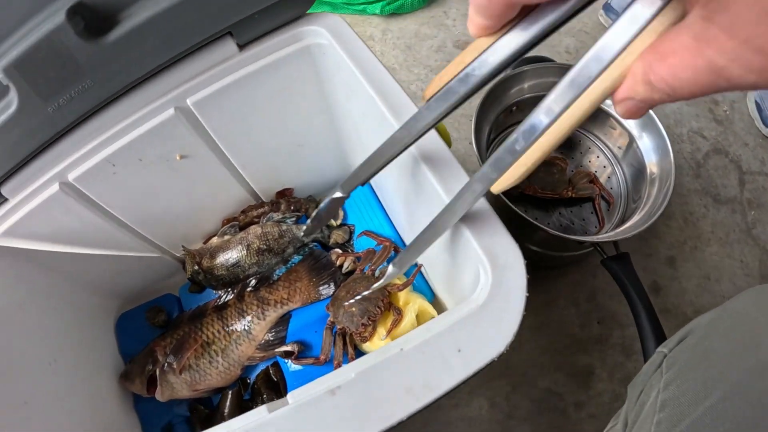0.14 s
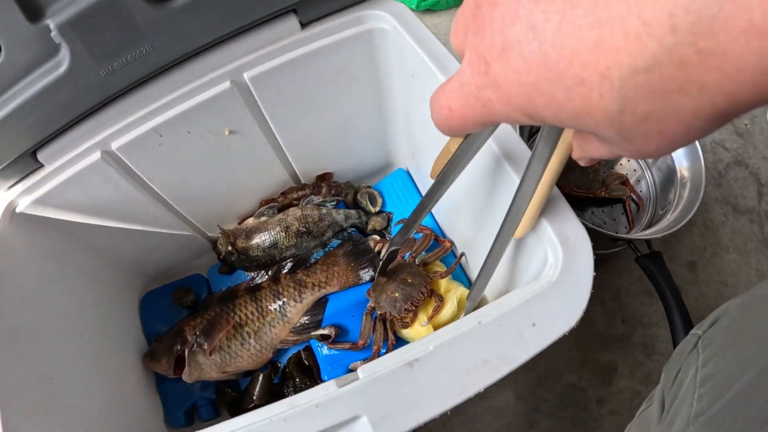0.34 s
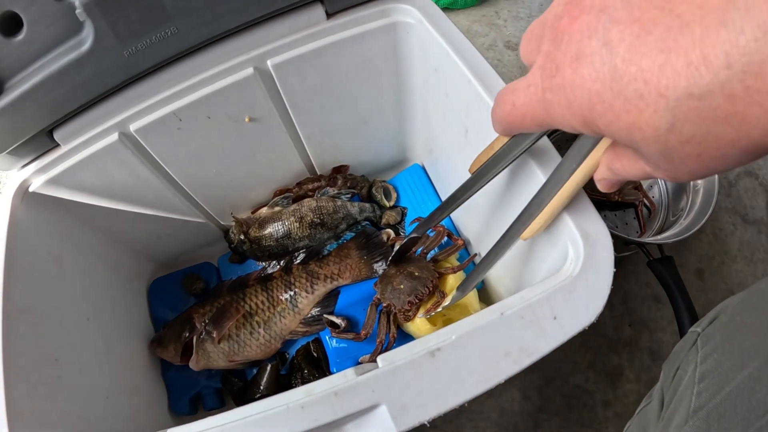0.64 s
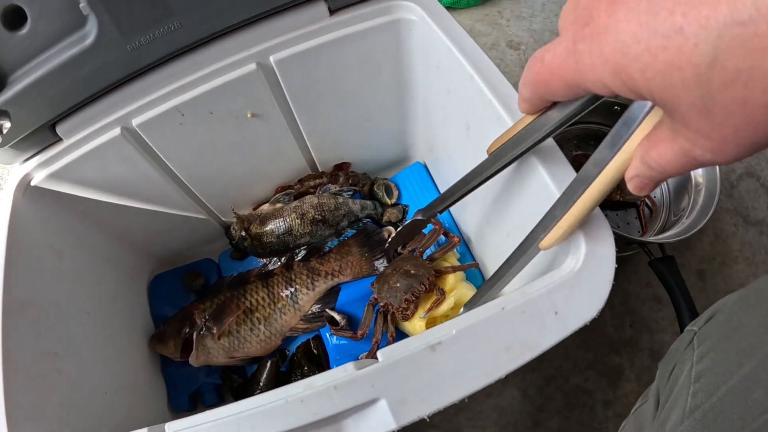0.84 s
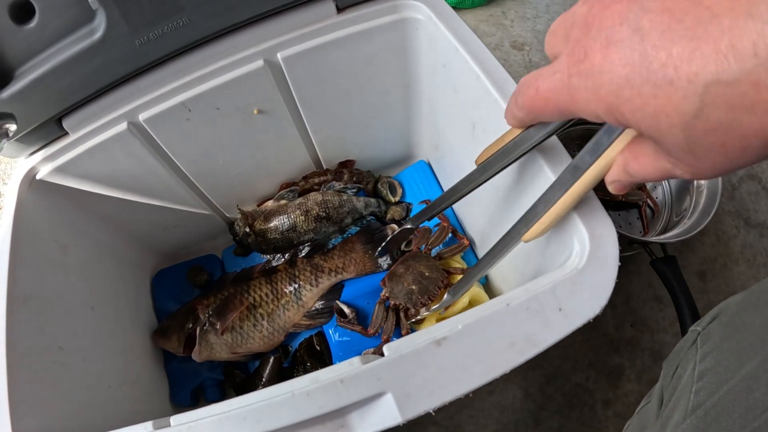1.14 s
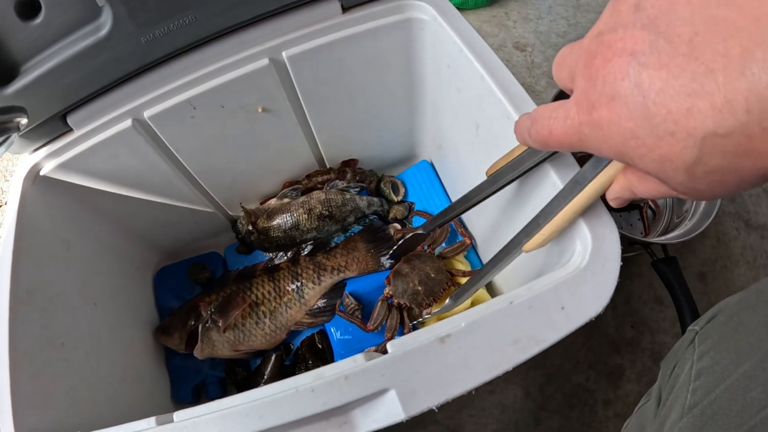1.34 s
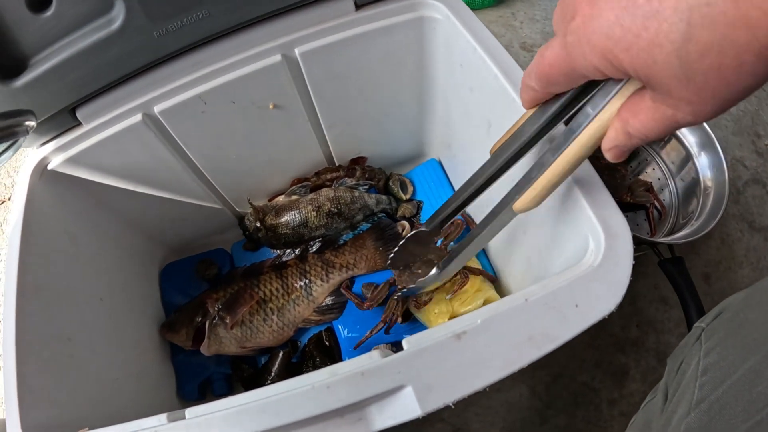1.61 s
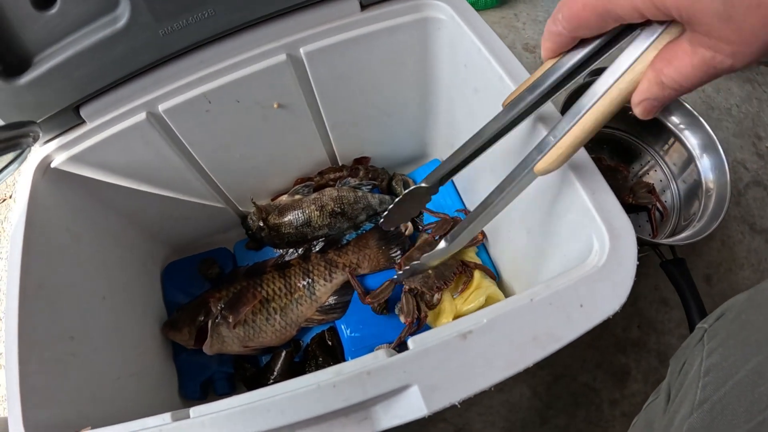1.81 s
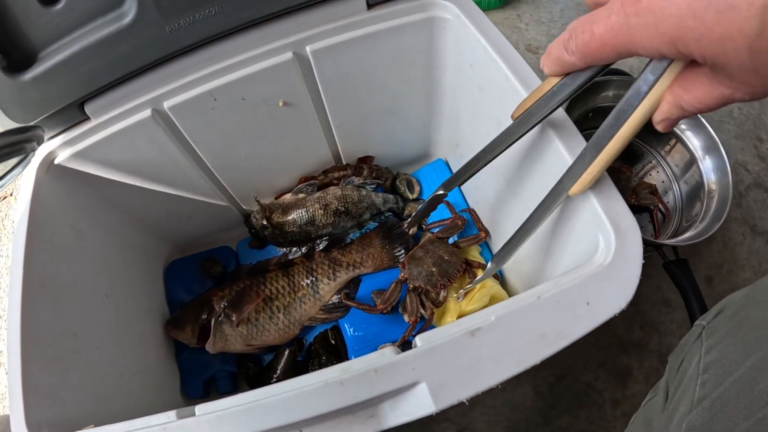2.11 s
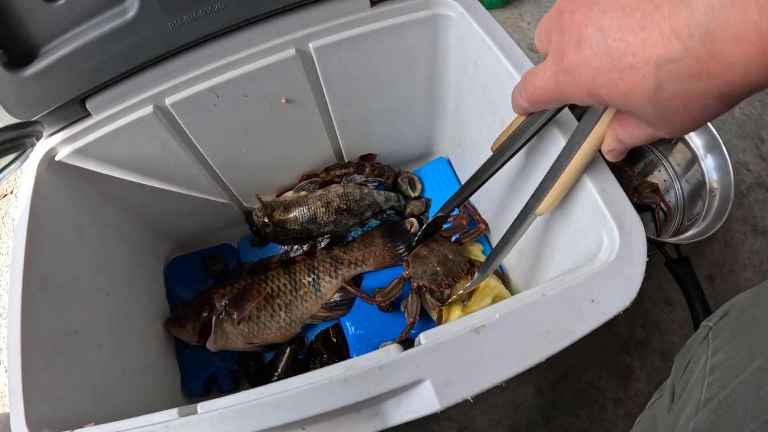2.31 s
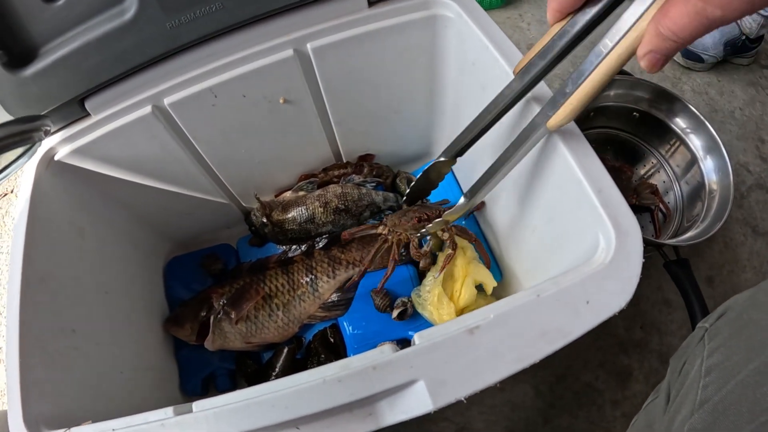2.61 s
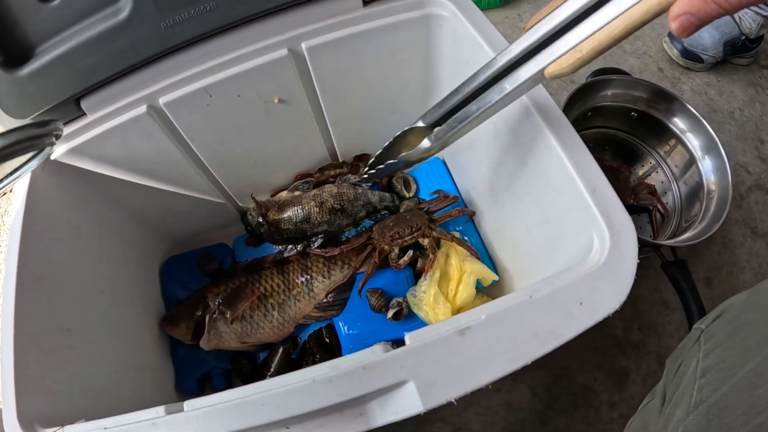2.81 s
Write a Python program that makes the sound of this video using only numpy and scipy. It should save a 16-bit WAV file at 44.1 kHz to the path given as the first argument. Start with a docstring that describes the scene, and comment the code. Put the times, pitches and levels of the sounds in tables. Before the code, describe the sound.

Metal tongs knock, click and scrape on crab shell inside a hollow plastic cooler, close up

```python
"""In a hollow plastic cooler, heard close by, steel tongs feel for a crab. Dull knocks boom: each rings
the wall modes (damped sines) and rattles the contents (dying noise). The tips click on shell and plastic
(short noise bursts), scrape over shell (clumps of tiny slips) and set the steel arms ringing. Behind them
a rustle and murmur rises and dips (wavering noise), with a faint hiss and a low rumble underneath."""
import sys
import numpy as np
from scipy import signal
from scipy.fft import rfft, irfft, next_fast_len
from scipy.io import wavfile
from scipy.ndimage import uniform_filter1d, map_coordinates

SR = 44100
rng = np.random.default_rng(int(sys.argv[2]) if len(sys.argv) > 2 else 0)


def voltage_ratio(decibels):
    """Convert decibels (scalar or array-like) to amplitude ratios, 20 dB per decade."""
    exponent = np.asarray(decibels, float) / 20
    return 10 ** exponent


def store_pcm(level_fs):
    """Save levels as 16-bit WAV."""
    pcm = np.round(np.clip(level_fs, -1, 1) * 32767).astype(np.int16)
    wavfile.write(sys.argv[1], SR, np.atleast_2d(pcm).T)


N = 130095  # length in samples

# Low rumble over time. Each row: time in seconds, level in dB.
RUMBLE_LEVELS = [(0.0, -60.5), (0.09, -53), (0.52, -48), (0.58, -65), (0.87, -58), (0.91, -42), (0.97, -58),
                 (1.31, -50), (1.33, -58), (1.76, -37), (1.86, -77), (2.0, -43), (2.04, -69), (2.55, -49.5),
                 (2.63, -82), (2.78, -58), (2.84, -40), (2.95, -72)]
# Tone colour of the rumble. Each row: frequency in Hz, relative level in dB.
RUMBLE_COLOUR = [(12, -36), (24, -4), (46, 0), (70, -6), (100, -11.5), (120, -12), (140, -33), (240, -120)]
# A faint narrow hiss over time. Each row: time in seconds, level in dB.
FAINT_LEVELS = [(2.055, -68.5), (2.09, -57.5), (2.135, -55.5)]
# Tone colour of that faint hiss. Each row: frequency in Hz, relative level in dB.
FAINT_COLOUR = [(2200, -37), (2700, -4), (3700, -4), (4300, -53)]
# Background rustle and murmur, which dip at times. Each row: time in seconds,
# then treble, mid and wall murmur levels in dB.
RUSTLE_LEVELS = [(0.0, -57, -45.5, -50), (0.15, -51.5, -42.5, -47), (0.25, -60.5, -46.5, -34.5),
                 (0.39, -52, -48.5, -32), (0.52, -49, -53, -39.5), (0.65, -49.5, -50.5, -45.5),
                 (0.81, -49.5, -57.5, -50), (0.93, -47, -49, -53), (1.055, -61.5, -59, -52.5),
                 (1.1, -49.5, -49, -47), (1.22, -44, -45, -47), (1.31, -54.5, -53, -43.5),
                 (1.49, -52, -51, -41), (1.61, -53, -54.5, -45), (1.66, -38, -47.5, -48),
                 (1.82, -50.5, -48.5, -41), (1.93, -62, -70.5, -60), (2.0, -63, -51, -30),
                 (2.08, -61, -53, -38.5), (2.16, -65, -63, -43), (2.23, -60, -57, -32),
                 (2.29, -50.5, -40, -39.5), (2.36, -49, -47.5, -26), (2.46, -45, -49.5, -36.5),
                 (2.52, -38, -48.5, -42.5), (2.65, -58.5, -62, -52.5), (2.73, -45, -51, -41.5),
                 (2.79, -45, -57, -51.5), (2.89, -47.5, -47, -41), (2.95, -60, -51, -52)]
# Colours of the rustle's treble, mid and wall murmur. Each row: frequency in Hz, relative level in dB.
RUSTLE_TREBLE = [(1180, -24), (2000, -3.5), (3830, 2), (4220, 0.5), (4570, -2.5), (6210, -4), (8520, -8),
                 (12400, -25.5), (16300, -30)]
RUSTLE_MID = [(240, -35), (420, 1), (700, -3.5), (1000, -0.5), (1130, -0.5), (1340, -2), (2600, -16.5),
              (3380, -27), (5720, -120)]
RUSTLE_WALLS = [(59, -34), (100, -12.5), (204, 2), (230, 5), (264, 1.5), (317, 2), (397, -10.5), (480, -15),
                (620, -20), (1060, -120)]
# How alike left and right are in the noises above. Each row: frequency in Hz, likeness from 0 to 1.
LIKENESS = [(100, .99), (500, 0.97), (2000, 0.68), (8000, 0.9), (14000, 0.18)]

# Small hollow things tapped. Each row: start in seconds, level in dB, pitch in Hz, time to fall 60 dB in s.
TAPS = [(.6, -38, 988, 0.089), (1.187, -31.5, 987, 0.075), (1.853, -49, 1000, 0.17),
        (2.654, -40, 1700, 0.037), (2.8924, -24, 392, .14)]
# Knocks through the cooler. Each row: start in seconds, level in dB before knock_db is added,
# then the deep mode and the upper modes in dB relative to that level.
KNOCKS = [(0.211, -2.5, -5, 5), (0.231, -8, 7.5, -25), (0.322, -29, -1, 10), (0.344, -2.5, -19, -2),
          (0.394, -11, -1.5, 1), (0.448, -21, -2, -14), (0.506, -16.5, 1, -2.5), (0.529, -23, -3, 3),
          (0.604, -20.5, -3, 2.5), (0.699, -14.5, 6, -6), (0.826, -30, 6, 0), (0.908, -16.5, 15.5, -1),
          (0.924, -18.5, 10, -7), (1.151, -27, -4, 6), (1.267, -3, -6.5, 1), (1.325, -22, 0, 1),
          (1.365, -34, 2, -2), (1.434, -11, -20, -9), (1.451, -3, -4.5, -1), (1.523, -17.5, -4, -0.5),
          (1.609, -19.5, 5, 2), (1.687, -22.5, -6, 4.5), (1.739, -28, 8, 7), (1.976, -3.5, 3.5, 2.5),
          (2.142, -2, -2, 1), (2.267, -18, 6, -11), (2.328, -20.5, 6, 2.5), (2.349, -15, -14, 1.5),
          (2.364, -17, -9, -14), (2.538, -34, 9, -11), (2.821, -21, 0, 4), (2.834, -27, 8, 1)]
# Wall modes of the cooler. Each row: frequency in Hz, relative level in dB, time to fall 60 dB in seconds.
DEEP_MODES = [(140.3, -21, 0.35)]
MAIN_MODES = [(207, -15.5, 0.28), (224.4, -1.5, 0.12)]
UPPER_MODES = [(263.6, -4, 0.048), (295.5, -9.5, 0.085), (334.5, -14.5, 0.078), (399.4, -28, 0.086),
               (624, -25.5, 0.045), (710, -32.5, 0.065), (1008, -20.5, 0.039)]
# Colour of the contents rattling after a knock. Each row: frequency in Hz, relative level in dB.
RATTLE_COLOUR = [(250, -43), (450, -2), (800, -6), (1500, -18.5), (3000, -36)]

# Scraping strokes. Each row: start and end in seconds, level at start and at end in dB,
# and level of the dull part relative to those in dB.
SCRAPES = [(1.517, 1.531, -34, -45, -13), (1.572, 1.586, -41, -34, -20), (1.588, 1.603, -25, -17.5, -18),
           (1.604, 1.634, -21.5, -36.5, -9), (1.638, 1.673, -24, -28, -14), (1.671, 1.698, -24, -24, -10.5),
           (1.698, 1.745, -40.5, -42.5, -10), (2.282, 2.321, -46.5, -35, -11),
           (2.333, 2.372, -42.5, -38, -3), (2.403, 2.451, -54, -47, -11), (2.475, 2.503, -41, -29.5, -7.5),
           (2.521, 2.571, -25.5, -38.5, -12), (2.568, 2.605, -59, -55.5, 7.5),
           (2.626, 2.663, -43.5, -48.5, -7.5), (2.674, 2.692, -30, -31.5, -12.5),
           (2.692, 2.725, -24.5, -27, -13.5), (2.737, 2.779, -30, -37, -9.5),
           (2.831, 2.872, -41, -41, -2.5)]
# Steel arms struck free. Each row: start in seconds, level in dB.
CLINKS = [(0.693, -39), (1.702, -11.5), (1.719, -20.5), (1.731, -25.5), (2.498, -35), (2.697, -28),
          (2.712, -23.5), (2.73, -22), (2.738, -18), (2.751, -33.5), (2.7607, -23), (2.769, -27)]
# Modes of the steel. Each row: frequency in Hz, relative level in dB, time to fall 60 dB in seconds.
STEEL_MODES = [(3175, -6, 0.045), (3268, -2, 0.052), (3370, -2, 0.017), (3650, 3, 0.025),
               (4400, -2.5, 0.028), (4950, -5.5, 0.0079), (6400, -14.5, 0.023), (6750, -26, .025),
               (7260, -26, .025)]
# Tips on shell and plastic. Each row: start in seconds, treble, upper mid and mid levels in dB before
# the offsets below, and time to fall 60 dB in seconds.
CLICKS = [(0.048, -36.5, -47.5, -37.5, 0.031), (0.2079, -24, -17, -16, 0.021),
          (0.2248, -62, -43, -51, 0.017), (0.34, -42.5, -33.5, -24, 0.022),
          (0.3896, -15.5, -36, -22.5, 0.019), (0.404, -23.5, -33.5, -27.5, 0.025),
          (0.4269, -29.5, -36, -34.5, 0.023), (0.4915, -29, -38, -38, 0.031),
          (0.5936, -28, -43, -44.5, 0.053), (0.6913, -28.5, -56, -44, 0.02), (0.902, -23, -23, -15, 0.015),
          (0.9185, -30, -44, -21.5, 0.011), (0.9275, -39, -55, -25.5, 0.0094),
          (1.0389, -37, -43, -63, 0.013), (1.0675, -26, -39, -37.5, 0.019),
          (1.0739, -23.5, -33.5, -39.5, 0.04), (1.1296, -21.5, -38, -37, 0.023),
          (1.1562, -21, -36.5, -33, 0.025), (1.2644, -30, -37, -23, 0.016), (1.279, -34, -45, -53, 0.032),
          (1.3224, -31.5, -42.5, -41.5, 0.031), (1.4392, -33, -34.5, -35.5, 0.026),
          (1.448, -36, -34.5, -31, 0.035), (1.4806, -32.5, -38, -44, 0.02),
          (1.5179, -21.5, -28.5, -30, 0.04), (1.5334, -17.5, -39, -30.5, 0.021),
          (1.5738, -18, -35, -55, 0.019), (1.6, -16.5, -30, -30, 0.019), (1.6144, -16, -18.5, -24.5, 0.018),
          (1.679, -10, -25, -43, 0.025), (1.7018, -12, -15, -34, 0.011), (1.7171, -16, -25, -41, 0.02),
          (1.7288, -16, -41, -48, 0.018), (1.784, -29.5, -51, -38, 0.027),
          (1.9724, -25.5, -23, -16.5, 0.017), (1.9948, -48, -48, -37, 0.041),
          (2.1397, -34, -31, -22, 0.022), (2.2837, -27.5, -61, -55, 0.028),
          (2.3451, -35.5, -32, -41, 0.045), (2.4244, -40, -36, -40, 0.025),
          (2.4435, -14.5, -25, -28.5, 0.023), (2.4482, -7.5, -31, -35, 0.026),
          (2.4508, -4.5, -22, -36.5, 0.024), (2.5201, -21.5, -44, -44, 0.03),
          (2.5795, -41, -40, -30, 0.021), (2.6278, -25.5, -38, -47, 0.022), (2.6745, -21, -43, -50, 0.0091),
          (2.7063, -16, -36, -51, 0.016), (2.7267, -14, -25, -30.5, 0.039), (2.7378, -1.5, -18, -30, 0.011),
          (2.7501, -20, -40, -48, 0.016), (2.759, -19.5, -36, -35, 0.017), (2.7678, -19, -31, -54, 0.016),
          (2.8185, -36, -40, -38, 0.054), (2.8342, -33, -35, -35.5, 0.035),
          (2.8492, -24.5, -31, -37, 0.024), (2.9183, -27, -25, -28, 0.016)]
# Onset times of a click. Each row: time in seconds; the rows are treble, upper mid and mid.
CLICK_RISES_S = [
    [0.00064],
    [.001],
    [0.0014],
]
# Colours of contact noise: treble, upper mid and mid. Each row: frequency in Hz, relative level in dB.
TREBLE_COLOUR = [(2710, -30.5), (4600, 0.5), (5480, -1), (6740, 2.5), (9250, -6.5), (10200, -19.5),
                 (12300, -19.5), (14800, -33), (16300, -53)]
EDGE_COLOUR = [(900, -67), (1800, -11.5), (2600, -1), (3800, 0.5), (4800, -5), (6500, -25), (11000, -73)]
MID_COLOUR = [(290, -17), (500, 1), (1000, 8), (1420, 9), (2400, -0.5), (3380, -27), (5720, -120)]

# Air inside the cooler. Each row: frequency in Hz, time to fall 60 dB in seconds.
BOX_DECAY = [(500, 0.09), (3000, 0.05), (12000, 0.032)]
# Level of the tongs' reflections in that air. Each row: frequency in Hz, level in dB.
BOX_LEVEL = [(500, -18), (2000, -11), (6000, -11.5), (13000, -6)]
# Sideways lean of the tongs. Each row: frequency in Hz, left over right in dB.
LEAN = [(500, 2), (2000, -4), (5000, -2), (9000, 0.9)]
# Small phase difference between left and right in the top treble. Each row: frequency in Hz,
# difference in radians.
PHASE_DIFFERENCE = [(9900, 0.52), (12700, 1)]

DETUNE = 0.015  # the grip and the load shift each mode by about this fraction from blow to blow
TREBLE_DB, EDGE_DB, MID_DB = -5, 3.5, 5.5  # level added to each click colour, in dB


def unit(x):
    """Scales to an rms of 1."""
    return x / np.sqrt(np.mean(x ** 2) + 1e-20)


def along(points, hz):
    """Reads (Hz, value) points on a log frequency axis."""
    f, v = np.transpose(points)
    return np.interp(np.log(hz + 1), np.log(f + 1), v)


def curves(rows):
    """Draws each column over time, in dB; -120 dB outside the rows."""
    s, *columns = np.transpose(rows)
    return [np.interp(np.arange(N) / SR, s, c, left=-120, right=-120) for c in columns]


def wobble(rate):
    """A smooth random curve with `rate` random points a second."""
    points = rng.standard_normal(int(N * rate / SR) + 4)
    return map_coordinates(points, [np.arange(N) * rate / SR])


def filtered(x, response):
    """Multiplies the spectrum of x by a function of frequency."""
    m = next_fast_len(N + 8192)
    return irfft(rfft(x, m) * response(np.fft.rfftfreq(m, 1 / SR)), m)[..., :N]


def coloured(x, spectrum):
    """Colours x without sounding ahead of it, keeping the power of white noise."""
    log_level = np.log(voltage_ratio(along(spectrum, np.fft.rfftfreq(4096, 1 / SR))) + 1e-6)
    cepstrum = irfft(log_level)  # folding it forward in time gives minimum phase
    cepstrum[1:2048] *= 2
    cepstrum[2049:] = 0
    h = irfft(np.exp(rfft(cepstrum)))
    return signal.fftconvolve(x, h / np.linalg.norm(h))[:N]


def add_at(out, s, sound):
    """Adds a sound to out, starting at s seconds."""
    out[..., round(s * SR):][..., :sound.shape[-1]] += sound


def ring(modes, t, scatter_db, spread=0):
    """Damped sines, each with a new level and tuning; spread (s) staggers their phases."""
    total = 0
    for (hz, db, t60), (a, b, c) in zip(modes, rng.standard_normal((len(modes), 3))):
        level = voltage_ratio(db + scatter_db * a - 60 * t / t60)
        total = total + level * np.sin(2 * np.pi * hz * ((1 + DETUNE * b) * t + spread * c))
    return total


def rush(spectrum):
    """Stereo noise of rms 1: a shared part and an opposed part, balanced by the likeness."""
    def response(hz):
        turn = np.arccos(np.clip(along(LIKENESS, hz), 0, 1)) / 2
        return voltage_ratio(along(spectrum, hz)) * [np.cos(turn), np.sin(turn)]
    mid, side = filtered(rng.standard_normal((2, N)), response)
    return unit(np.array([mid + side, mid - side]))


def rumble():
    """Low noise that comes and goes and slowly wavers."""
    return voltage_ratio(curves(RUMBLE_LEVELS)[0] + 3.0 * wobble(12)) * rush(RUMBLE_COLOUR)


def faint_hiss():
    """Noise in a narrow band, heard for a moment."""
    return voltage_ratio(curves(FAINT_LEVELS)[0]) * rush(FAINT_COLOUR + [(9000, -120)])


def rustle():
    """Background rustle and murmur: flickering treble and mid noise, and low noise in the walls."""
    treble_db, mid_db, walls_db = curves(RUSTLE_LEVELS)
    shared_db = 0.53 * wobble(29.89) + 1.85 * wobble(220)  # treble and mid flicker together
    treble = voltage_ratio(treble_db + shared_db + 0.55 * wobble(54)) * rush(RUSTLE_TREBLE)
    mid = voltage_ratio(mid_db + shared_db + 2.9 * wobble(40.06)) * rush(RUSTLE_MID)
    murmur = voltage_ratio(walls_db + 2.5 * wobble(24.98)) * rush(RUSTLE_WALLS)
    return treble + mid + murmur


def taps():
    """Small hollow things tapped: each rings one damped sine after a soft onset."""
    rise_s = 0.002
    out, t = np.zeros(N + SR), np.arange(SR // 2) / SR
    for s, db, hz, t60 in TAPS:
        add_at(out, s, (1 - np.exp(-t / rise_s)) * ring([(hz, db, t60)], t, 1))
    return out[:N]


def knocks():
    """Each knock swells briefly, rings the wall modes and shakes the loose contents into dying noise."""
    swell_s, gather_s = 0.0045, 0.0046  # the walls take a moment to move; the modes then swing together
    knock_db, rattle_db, rattle_t60_s = -1, -32, 0.15
    out, shake, t = np.zeros(N + SR), np.zeros(N + SR), np.arange(SR // 2) / SR
    swell, late = (1 - np.exp(-t / swell_s)) ** 2, t - gather_s
    for s, db, deep_db, upper_db in KNOCKS:
        modes = ring(MAIN_MODES, late, 1)
        modes = modes + voltage_ratio(deep_db) * ring(DEEP_MODES, late, 0.66)
        modes = modes + voltage_ratio(upper_db) * ring(UPPER_MODES, late, 1.7)
        add_at(out, s, voltage_ratio(db + knock_db) * swell * modes)
        add_at(shake, s, voltage_ratio(db + rattle_db - 60 * t / rattle_t60_s) * swell)
    rattle = coloured(shake * rng.standard_normal(N + SR), RATTLE_COLOUR + [(6000, -86)])
    return out[:N] + rattle


def box(x):
    """Short reflections inside the cooler: decaying noise, different on each side."""
    hz, t, z = signal.stft(rng.standard_normal((2, SR // 4)), SR, nperseg=128)
    decay = voltage_ratio(-60 * t / along(BOX_DECAY, hz)[:, None])
    tail = signal.istft(z * decay, SR, nperseg=128)[1]
    late = np.pad(x, (60, 0))[None]  # 60 samples later
    return signal.fftconvolve(late, tail / np.linalg.norm(tail[0]), axes=1)[:, :N]


def scrape():
    """Clumped tiny slips of the tips on shell, partly through the steel modes."""
    slips_per_s, spread_db, clump_db, edge_db, ring_db = 6000, 2.5, 3.5, -9.5, -9
    happens = rng.random((2, N)) < slips_per_s / SR
    strength = voltage_ratio(spread_db * np.minimum(rng.exponential(size=(2, N)), 3))
    slips = happens * rng.standard_normal((2, N)) * strength
    stroke = 0
    for s0, s1, db0, db1, dull_db in SCRAPES:
        stroke = stroke + voltage_ratio(curves([(s0, db0, db0 + dull_db), (s1, db1, db1 + dull_db)]))
    fine, dull = unit(slips * voltage_ratio(clump_db * wobble(250))) * uniform_filter1d(stroke, size=60)
    steel = ring(STEEL_MODES, np.arange(SR // 5) / SR, 0, spread=0.99)
    ringing = signal.fftconvolve(fine, steel / np.linalg.norm(steel))[:N]
    contact = coloured(fine, TREBLE_COLOUR) + voltage_ratio(edge_db) * coloured(fine, EDGE_COLOUR)
    return contact + coloured(dull, MID_COLOUR) + voltage_ratio(ring_db) * ringing


def clinks():
    """Some blows set the steel arms ringing: damped sines with scattered phases."""
    rise_s = 0.00018  # onset of steel on steel
    out, t = np.zeros(N + SR), np.arange(SR // 5) / SR
    for s, db in CLINKS:
        add_at(out, s, voltage_ratio(db) * (1 - np.exp(-t / rise_s)) * ring(STEEL_MODES, t, 2.3, spread=1))
    return out[:N]


def clicks():
    """Tips hit shell and plastic: a dying burst of contact noise in three colours."""
    bands, t = np.zeros((3, N + SR)), np.arange(SR // 5) / SR
    for s, treble_db, edge_db, mid_db, t60 in CLICKS:
        # the root of the envelope shapes the noise once before its spectrum is evened and once after
        half = np.sqrt((1 - np.exp(-t / np.abs(CLICK_RISES_S))) * voltage_ratio(-60 * t / max(t60, .004)))
        z = rfft(half * rng.standard_normal((3, len(t))))
        even = irfft(z / np.abs(z), len(t)) * half  # evened so that each click's colour comes from its band levels
        wanted = np.linalg.norm(half ** 2, axis=1, keepdims=True)
        burst = even * wanted / np.linalg.norm(even, axis=1, keepdims=True)
        add_at(bands, s, voltage_ratio([[treble_db + TREBLE_DB], [edge_db + EDGE_DB], [mid_db + MID_DB]]) * burst)
    treble, edge, mid = bands
    return coloured(treble, TREBLE_COLOUR) + coloured(edge, EDGE_COLOUR) + coloured(mid, MID_COLOUR)


def placed(tongs):
    """Places the tongs by a level and a small phase difference between left and right."""
    def response(hz):
        sides = np.array([[.5], [-.5]])  # half of each difference on either side
        return voltage_ratio(along(LEAN, hz) * sides) * np.exp(1j * along(PHASE_DIFFERENCE, hz) * sides)
    return filtered(tongs, response)


def scene():
    """Mixes the background, the cooler's walls and the tongs in stereo."""
    background = rumble() + faint_hiss() + rustle()
    walls = knocks() + taps()
    walls_direct = walls * voltage_ratio([[-.15], [.15]])  # dB: a touch louder on the right
    walls_around = voltage_ratio(-28) * box(walls)  # the walls differ a little between the sides
    tongs = scrape() + clinks() + clicks()
    tongs = tongs + filtered(box(tongs), lambda hz: voltage_ratio(along(BOX_LEVEL, hz)))
    return background + walls_direct + walls_around + placed(tongs)


def low_pass(x):
    """Removes everything above the highest recorded frequency."""
    return signal.sosfilt(signal.butter(12, 16460, fs=SR, output="sos"), x)


def record(dry):
    """The input rounds off peaks, and nothing above the top frequency passes."""
    peak, top_hz = 0.87, 16460
    soft = dry / (1 + np.abs(dry / peak) ** 4) ** (1 / 4)
    finished = filtered(soft, lambda hz: hz < top_hz)
    return low_pass(finished)


dry = scene()
out = record(dry)
store_pcm(out)
```